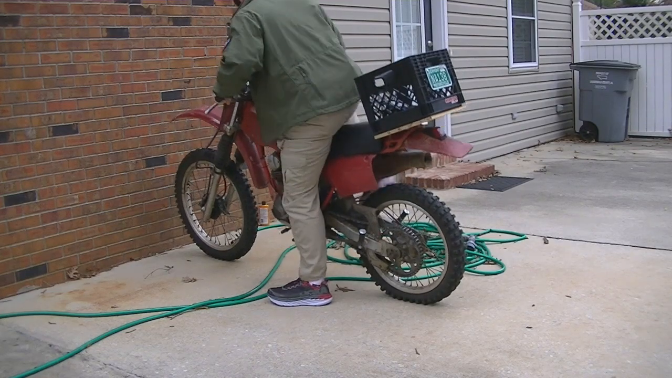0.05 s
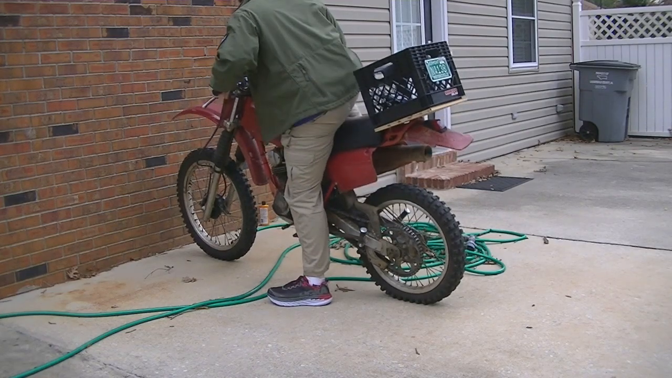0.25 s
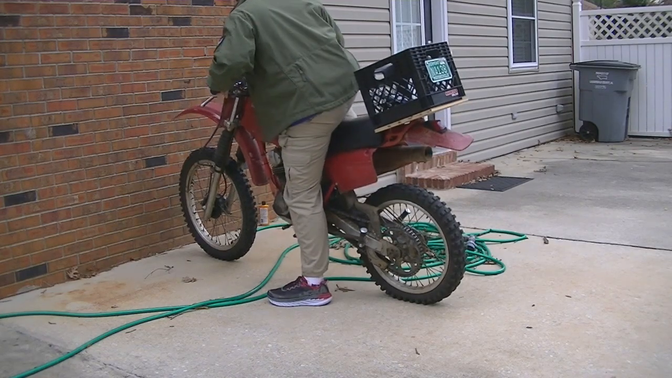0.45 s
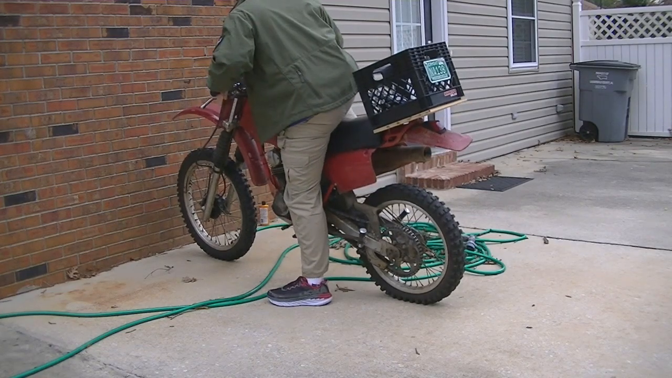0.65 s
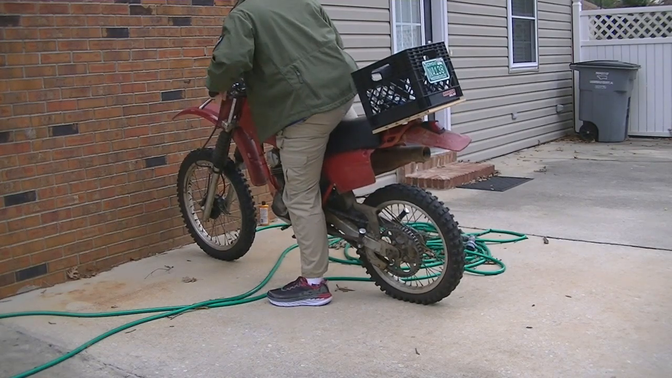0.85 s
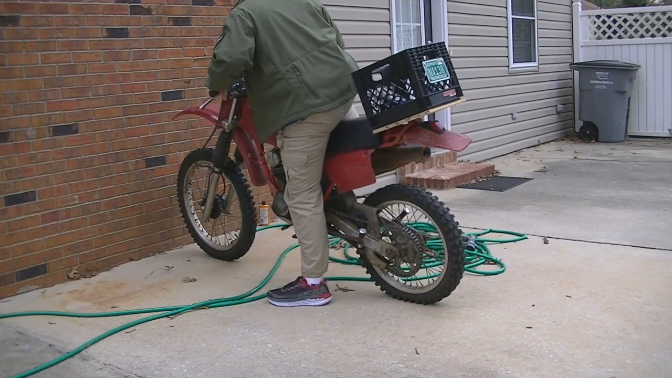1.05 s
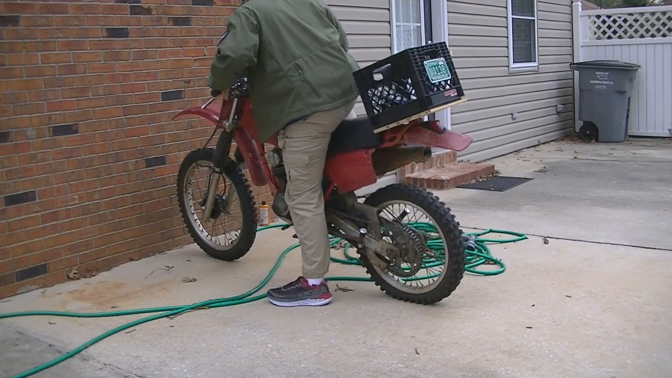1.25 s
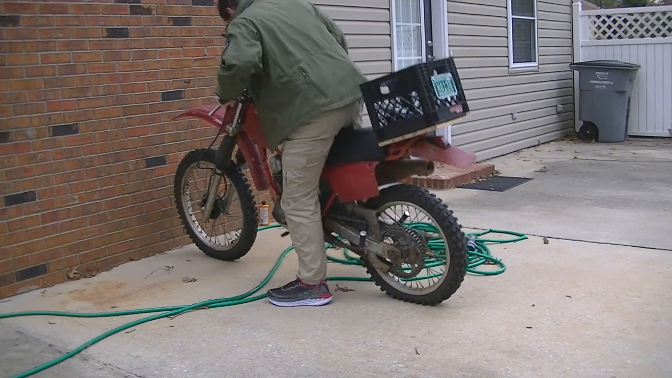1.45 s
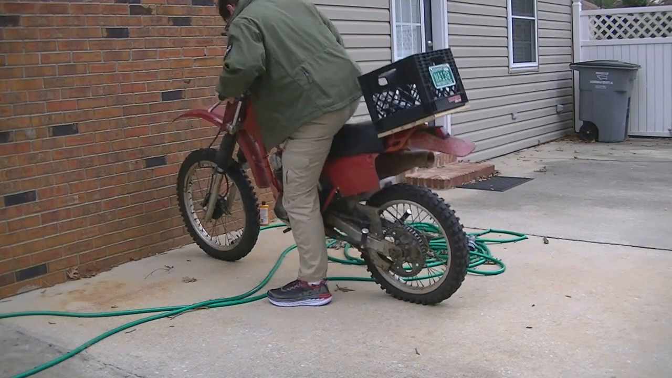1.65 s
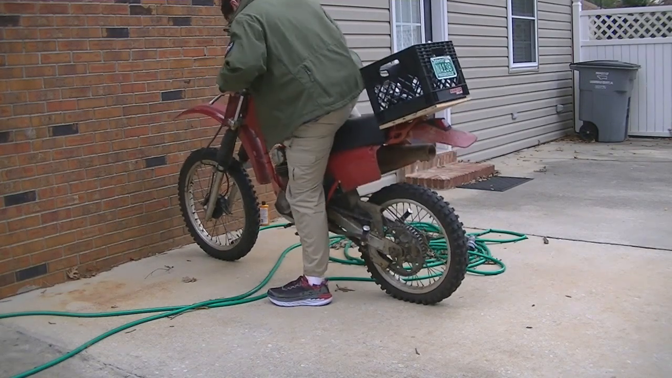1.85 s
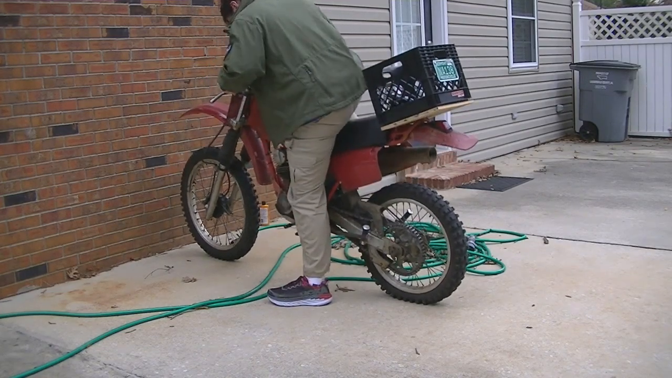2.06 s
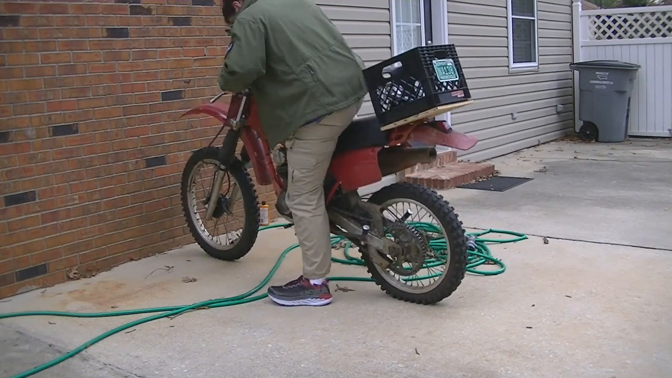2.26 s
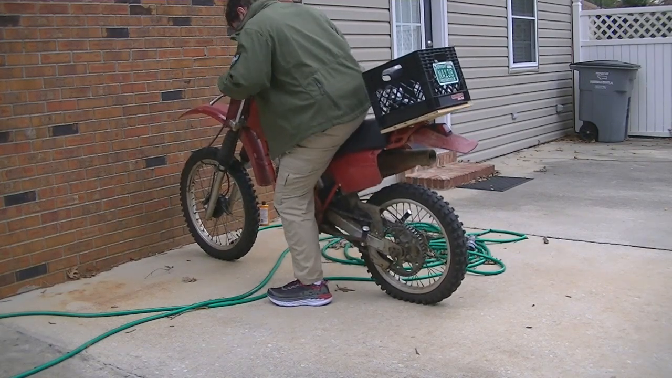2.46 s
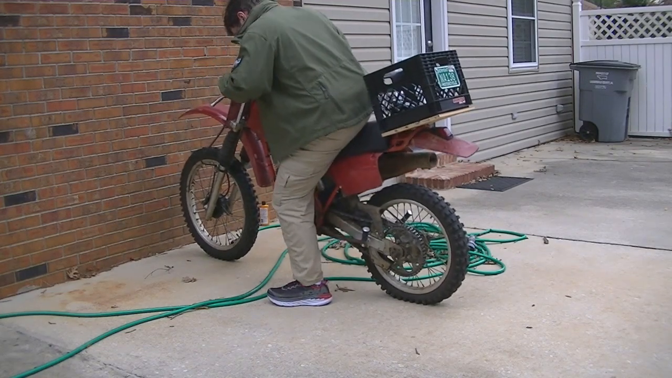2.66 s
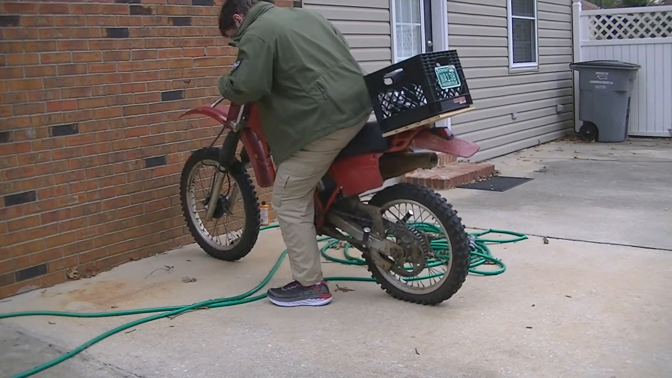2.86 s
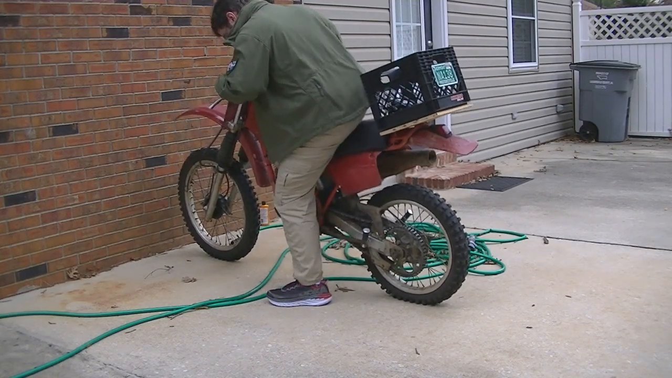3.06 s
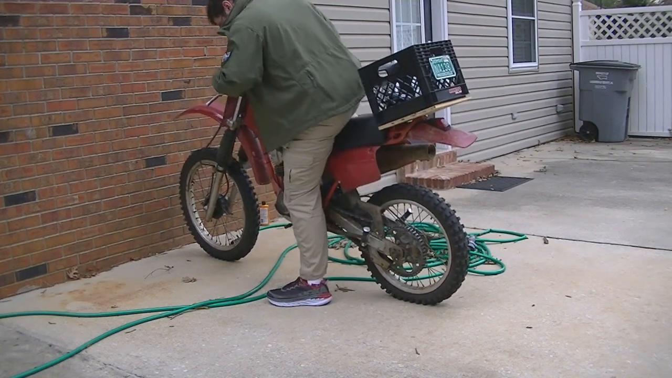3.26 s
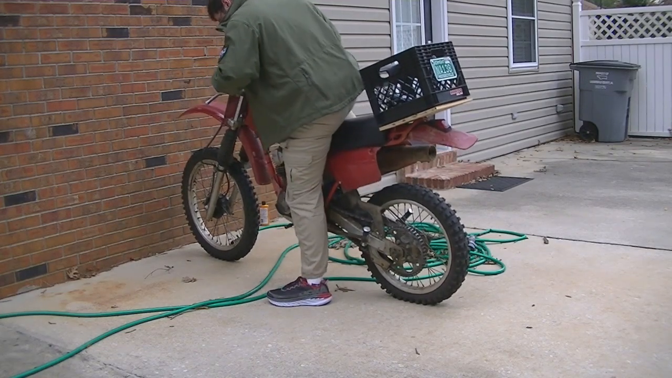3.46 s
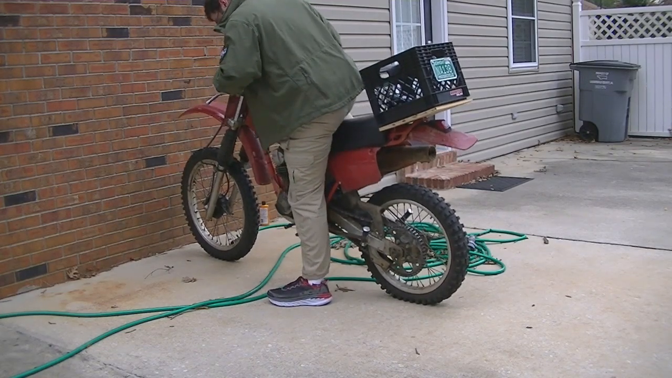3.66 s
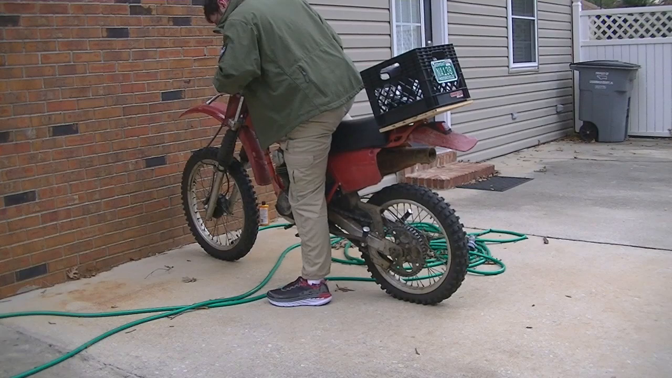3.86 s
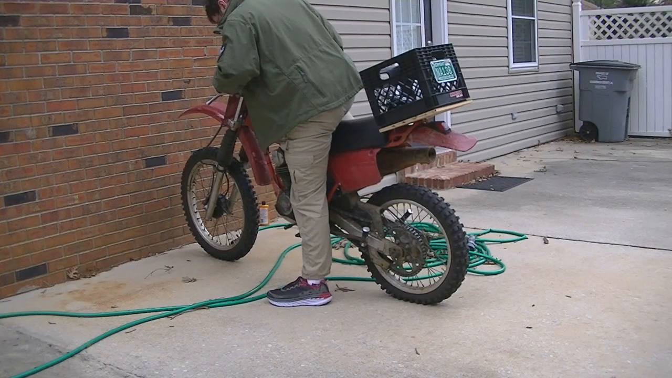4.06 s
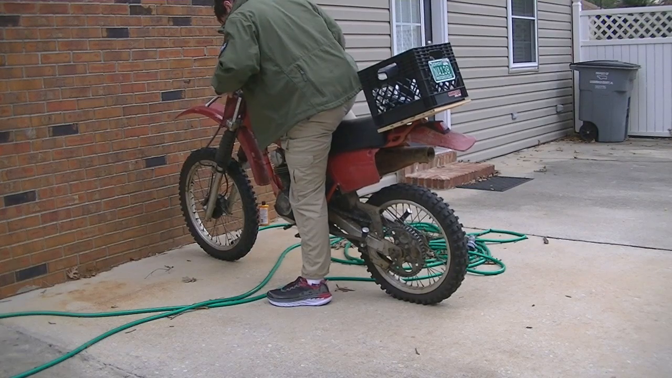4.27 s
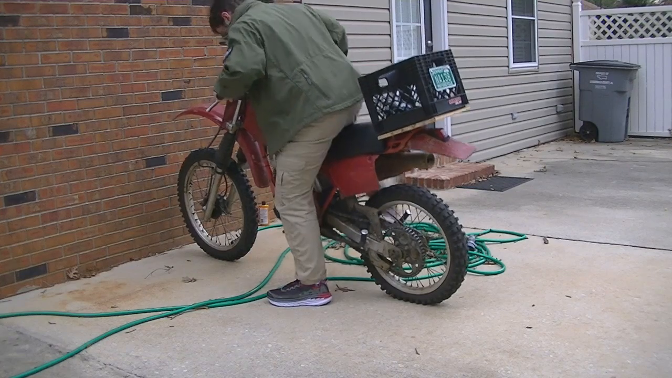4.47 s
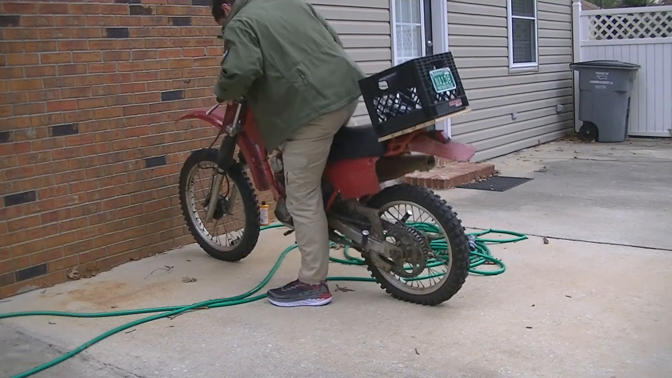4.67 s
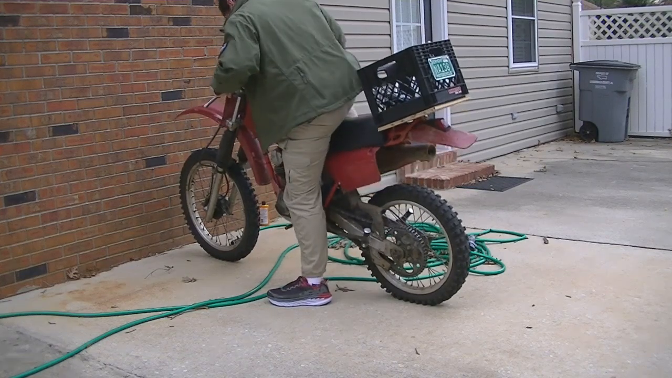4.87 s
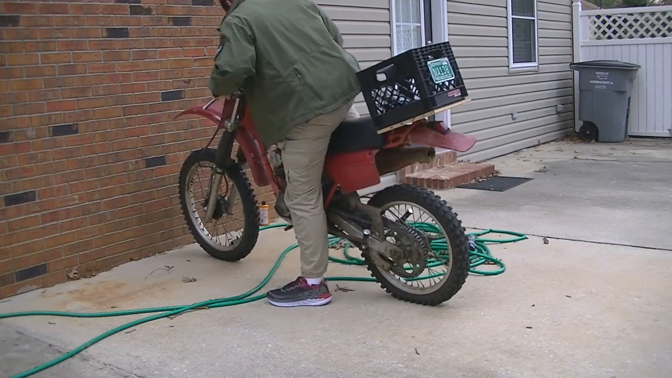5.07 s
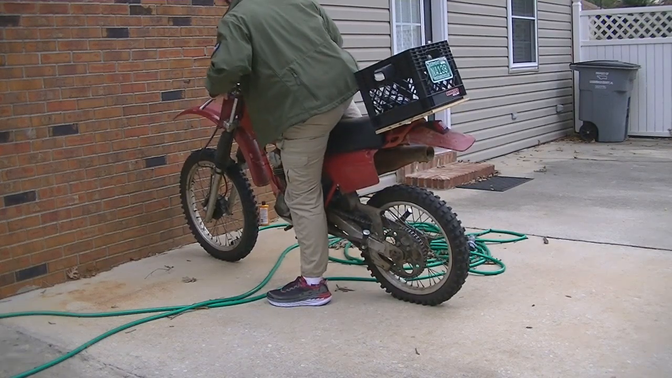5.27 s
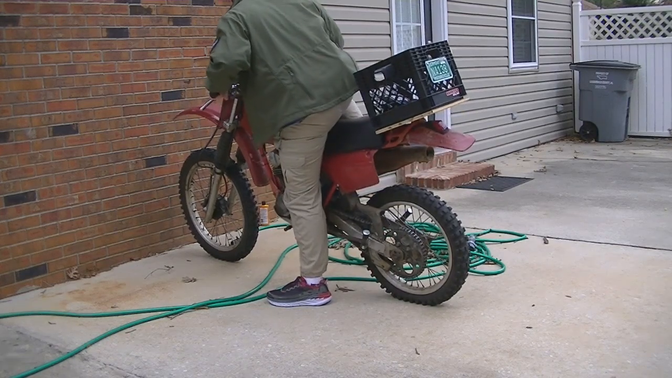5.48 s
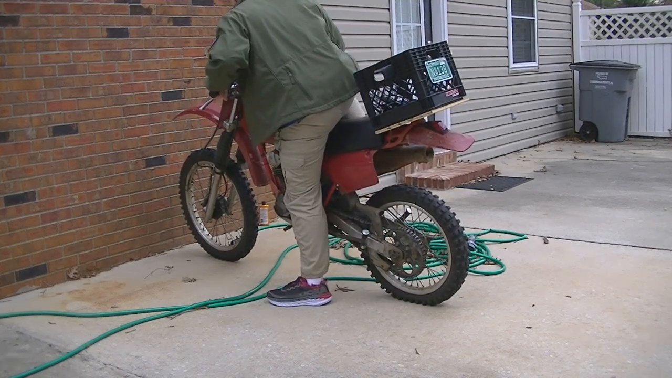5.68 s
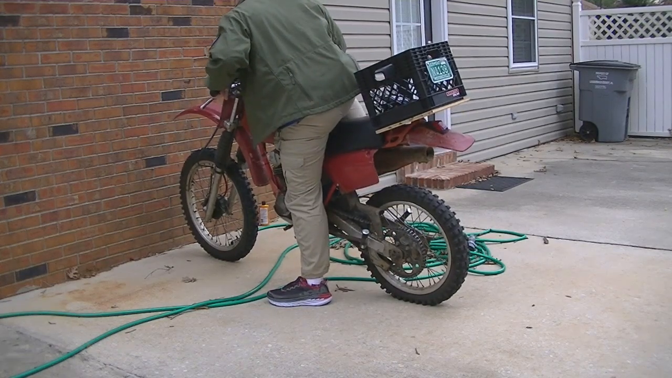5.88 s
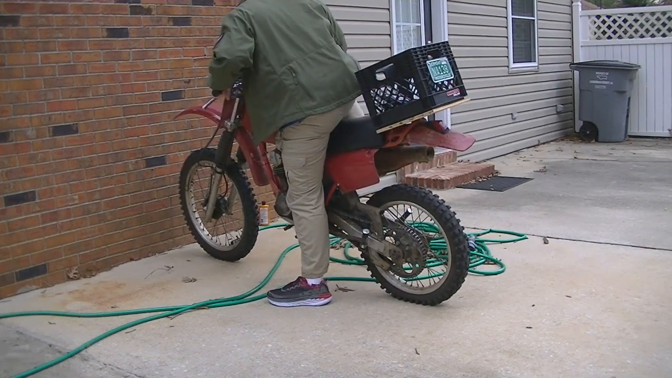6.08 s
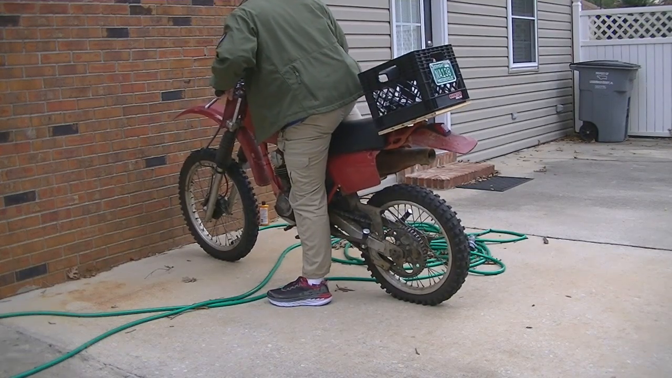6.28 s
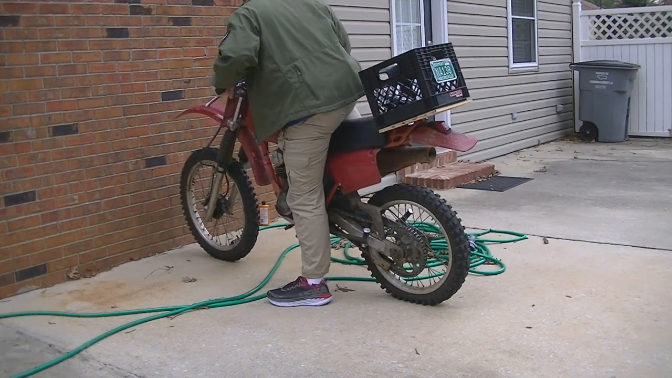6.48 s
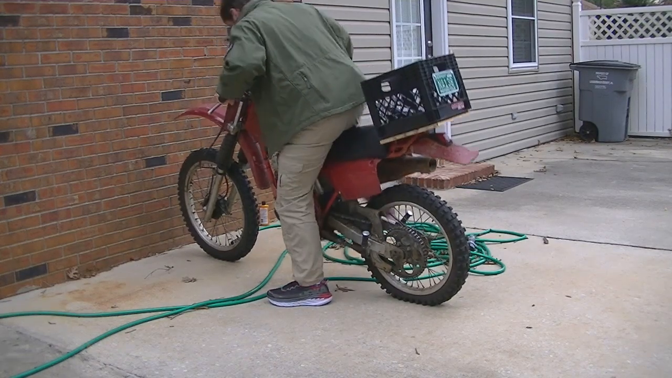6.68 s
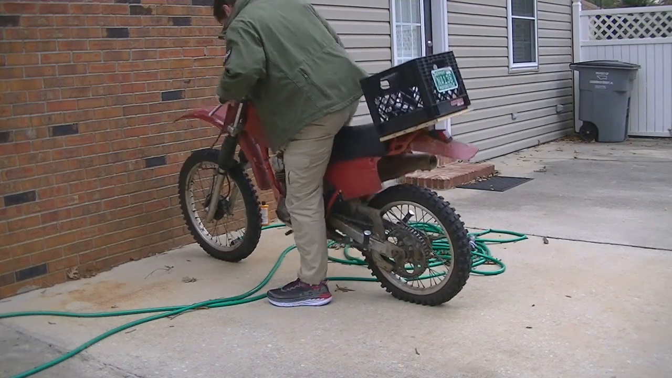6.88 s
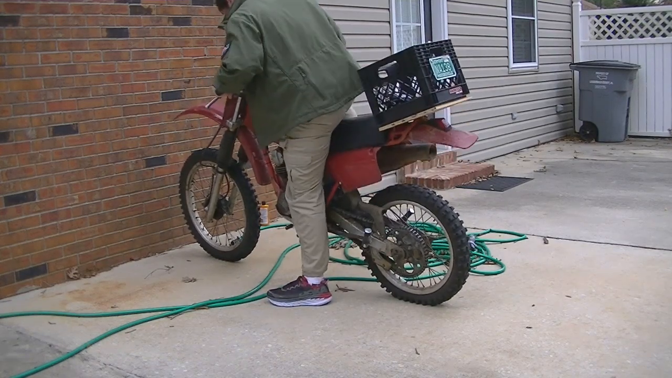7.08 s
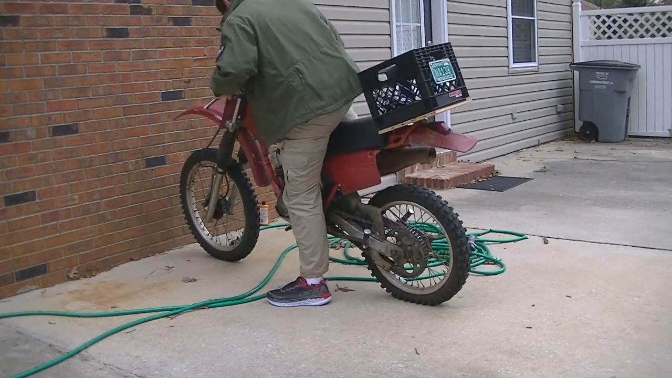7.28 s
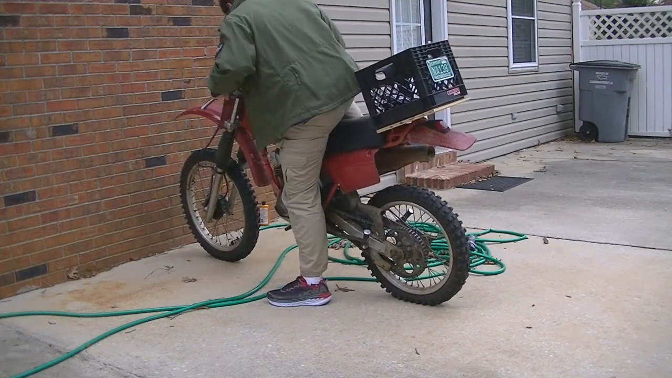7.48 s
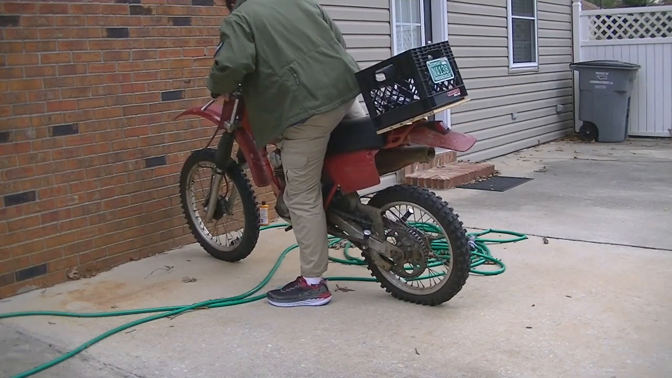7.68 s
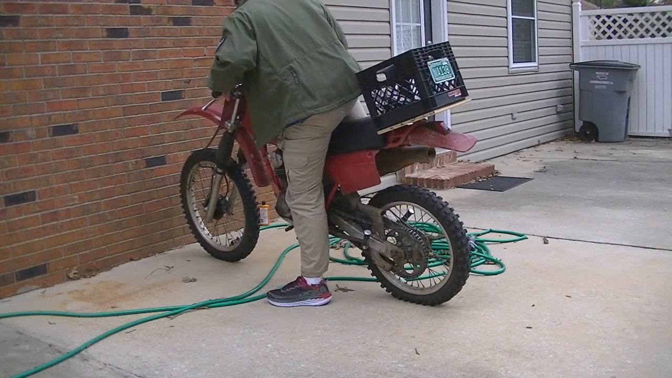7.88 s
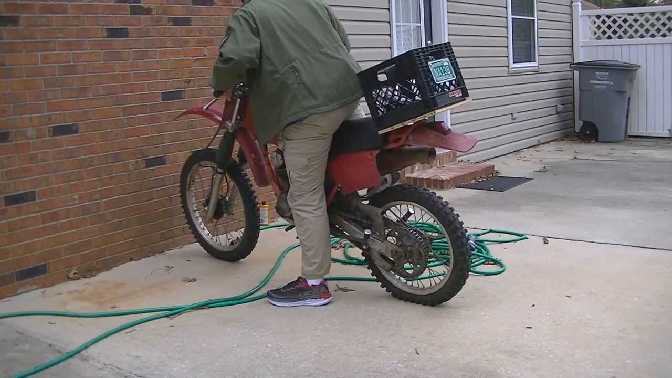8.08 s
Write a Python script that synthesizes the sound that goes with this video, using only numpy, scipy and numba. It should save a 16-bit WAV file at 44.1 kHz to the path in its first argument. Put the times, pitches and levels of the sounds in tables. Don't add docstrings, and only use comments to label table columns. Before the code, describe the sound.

Someone kicks over a cold dirt bike three times outdoors, metal clanking, gears whirring and exhaust chuffing, but the engine never catches; low hum behind.

```python
import sys
import numpy as np
from scipy import signal
from scipy.fft import rfft, irfft
from scipy.io import wavfile
from scipy.ndimage import uniform_filter1d
from numba import njit

SR = 44100
rng = np.random.default_rng(int(sys.argv[2]) if len(sys.argv) > 2 else 0)


def gain_from_decibels(decibels):
    exponent = np.asarray(decibels, float) / 20
    return 10 ** exponent


def waveform_to_disk(signal):
    frames = np.transpose(np.atleast_2d(signal))
    scaled = np.clip(frames, -1, 1) * 32767
    samples = np.round(scaled).astype(np.int16)
    wavfile.write(sys.argv[1], SR, samples)


N = 358533


@njit
def ring(x, hz, t60, gain):
    y = np.zeros(len(x))
    for m in range(len(hz)):
        turn = np.exp((2j * np.pi * hz[m] - np.log(1000) / t60[m]) / SR)
        state = 0j
        for i in range(len(x)):
            state = state * turn + x[i]
            y[i] += gain[m] * state.imag
    return y


def unit(x):
    return x / np.sqrt(np.mean(x ** 2))


def colour(x, points):
    hz, db = np.transpose(points)
    f = np.maximum(np.fft.rfftfreq(len(x), 1 / SR), 1)
    gain = gain_from_decibels(np.interp(np.log(f), np.log(hz), db))
    return irfft(rfft(x) * gain, len(x))


def walk(rate):
    hold = int(SR / rate)
    steps = np.repeat(rng.standard_normal(N // hold + 1), hold)
    return 1.417 * uniform_filter1d(uniform_filter1d(steps, hold), hold)[:N]


def grains(size, spread_db):
    return unit(rng.standard_normal(size) * gain_from_decibels(spread_db * rng.exponential(size=size)))


def add(out, s, x, db):
    i = int(s * SR)
    out[i:i + len(x)] += (x * gain_from_decibels(db) / np.abs(x).max())[:len(out) - i]


def metal(low_db, mid_db, high_db):
    return [(150, low_db - 10), (450, low_db + 7.0), (1100, low_db + 12), (1600, 0),
            (3000, 0.45 * mid_db), (4800, mid_db),
            (7500, high_db), (11000, high_db - 7.5), (15500, high_db - 14.5)]


# frequency in Hz, level in dB per Hz.
TRAFFIC = [(15, -36), (25, -44), (43, -19.5), (102, -9), (134, -9.5), (190, -14.5), (249, -9.5),
           (317, -13.5), (427, -10.5), (463, -16), (503, -12), (863, -11.5), (1600, -19.5), (2500, -25),
           (16000, -36.5)]
# frequency in Hz, level in dB.
FAINT = [(55., -67), (187., -58.5), (216., -59.5), (225., -63), (350., -62.5), (378., -60), (430., -63),
         (505., -61.5), (646., -65.5)]
# time in seconds, lower compressor, upper compressor and fan in dB.
MACHINES = [(0, -68, -54, -65), (.8, -55, -57, -59), (1.2, -56.5, -65, -54.5), (2.2, -50.5, -49, -59),
            (2.7, -59, -51.5, -54), (3.45, -47, -48, -59.5), (4.1, -57, -52, -50.5),
            (4.7, -49.5, -56.5, -53), (5.5, -58, -48.5, -49.5), (6.1, -55.5, -48.5, -56),
            (7.1, -47.5, -48, -48), (7.5, -46.5, -57, -54), (8.13, -60, -47, -50)]
# start and length in seconds, level in dB.
SURGES = [(0.2, 0.8, -52.5), (1.173, 0.51, -48.5), (1.948, 0.58, -44), (2.76, 0.73, -51.5),
          (3.683, 0.55, -50.5), (4.756, 0.29, -51), (6.127, 0.99, -49), (7.5, 0.99, -56)]


def yard():
    t = np.arange(N) / SR

    def tone(hz, drift_hz, db):
        phase = 2 * np.pi * np.cumsum(hz + drift_hz * walk(2.2)) / SR
        return np.sin(phase) * gain_from_decibels(db + 2.46 * walk(11.0))

    s, *columns = np.transpose(MACHINES)
    low_db, high_db, fan_db = (np.interp(t, s, c) for c in columns)
    out = tone(126.7, .4, low_db + 3) + tone(134.9, .4, high_db + 3) + tone(161., .5, fan_db + 3)
    surge = gain_from_decibels(-63)
    for start, length, db in SURGES:
        swell = np.sin(np.pi * np.clip((t - start) / length, 0, 1)).clip(0)
        surge = surge + gain_from_decibels(db) * np.sqrt(swell)
    out += tone(251.6, 0.907, 0.2) * surge
    for hz, db in FAINT:
        out += tone(hz, 1.164, db + 2.8 * walk(2.58))

    traffic_db, hiss_db = -46.5, -47
    car_db = 1.4 * np.exp(-((t - 5.57) / 1) ** 2)
    treble = [(9000, -34.5), (13000, -40.5), (16000, -43)]
    bed = unit(colour(rng.standard_normal(N), TRAFFIC[:-1] + treble))
    octaves = np.log2(np.fft.rfftfreq(N, 1 / SR) + 1)
    for hz in 15 * 2 ** np.arange(11):
        band = irfft(rfft(bed) * (1 - np.abs(octaves - np.log2(hz))).clip(0), N)
        if hz < 1500:
            level_db = traffic_db + car_db + 0.6 * walk(5.04)
        else:
            level_db = hiss_db + 1.25 * walk(5.1)
        out += band * gain_from_decibels(level_db)
    return out


# lowest Hz, highest Hz, cycles of ring.
FRAME = (700, 16000, 40)
# time in seconds, whirr level in dB.
WHIRR = [
    [(0.0, -44), (.06, -46.5), (0.13, -46.5), (.2, -50), (.3, -49), (0.346, -57), (0.5, -59.5)],
    [(1.27, -82), (1.362, -53), (1.44, -37.5), (1.518, -30), (1.594, -42.5), (1.65, -46), (1.68, -44.5),
     (1.76, -54), (1.83, -53), (2.05, -55.5)],
    [(4.36, -62), (4.478, -43.5), (4.52, -37.5), (4.608, -34.5), (4.66, -40.5), (4.79, -37), (4.86, -44.5),
     (4.97, -48.5), (5.1, -56)],
    [(6.55, -81), (6.68, -33.5), (6.834, -33.5), (6.902, -35), (6.98, -36.5), (7.09, -48.5), (7.16, -50),
     (7.35, -54)],
]
PUSH_S = (-0.5, 0.76, 4.5, 6.5)


def whirr():
    out = np.zeros(N)

    def scrape(hz):
        fits = grains(N, 0.9) * gain_from_decibels(4.6 * walk(30))
        return unit(ring(fits, np.array([hz]), np.array([22 / hz + 0.0029]), np.ones(1)))

    panels = unit(sum(scrape(hz) * np.sqrt(hz) for hz in np.geomspace(*FRAME[:2], num=24)))
    cases = panels + .9 * unit(grains(N, 2.7) * gain_from_decibels(4.0 * walk(160)))
    teeth_per_s, tooth_s = 170, .001
    teeth = (rng.random(N) < teeth_per_s / SR) * gain_from_decibels(2.5 * rng.standard_normal(N))
    tooth_fades = signal.lfilter([1], [1, -np.exp(-1 / tooth_s / SR)], teeth)
    cases += gain_from_decibels(-4) * unit(rng.standard_normal(N) * tooth_fades)

    main = metal(-12.5, -4.5, -25.0)
    groan = [(120, -10), (300, 24.0), (1200, 2.0), (1800, -20.0)]
    sizzle = [(4500, -10), (6500, 1), (15000, -11)]
    parts = [unit(colour(cases, points)) * gain_from_decibels(1.4 * walk(45)) for points in (main, groan, sizzle)]
    for table, push in zip(WHIRR, PUSH_S):
        s, level_db = np.transpose(table)
        t = np.arange(int(s[0] * SR), int(s[-1] * SR))
        low_db = np.interp(t / SR - push, (0, 0.29), (5, -10.5))
        for part, share_db in zip(parts, (0, low_db, -11.5)):
            out[t] += part[t] * gain_from_decibels(np.interp(t / SR, s, level_db) + share_db)
    return out


# start in seconds, peak in dB, note in Hz, length in seconds.
FLECKS = [(.024, -25, 2700, 0.0057), (0.031, -32, 3770, .012), (0.069, -33, 2390, 0.014),
          (0.163, -41, 1200, .02), (0.173, -35, 3220, .012), (0.177, -44, 6600, .015),
          (.292, -41, 4300, .016), (0.295, -40, 2900, .014), (1.421, -24, 3150, 0.0041),
          (1.422, -30, 4500, .012), (1.476, -23, 2740, 0.0081), (1.58, -33, 1150, 0.022),
          (1.621, -33, 3780, .03), (1.69, -35, 4720, 0.031), (1.716, -34, 4400, .035),
          (1.717, -42, 1200, .01), (1.732, -34.5, 5970, 0.024), (1.78, -34, 3230, 0.011),
          (4.775, -24, 2150, 0.022), (4.83, -41, 3520, .01), (4.84, -34.5, 3130, 0.019),
          (4.965, -39, 4300, .008), (6.683, -20, 3070, 0.0067), (6.892, -30, 4430, 0.027),
          (6.954, -33, 1870, .02), (7.106, -24.5, 4300, .01), (0.208, -26, 5600, 0.0072),
          (7.125, -45, 6900, 0.017), (7.943, -44, 5500, .008), (8.003, -45, 6150, 0.025),
          (8.034, -42, 3230, 0.0066), (8.118, -47, 5000, 0.01)]


def flecks():
    out, t = np.zeros(N), np.arange(4096) / SR
    for s, db, hz, length in FLECKS:
        stroke = np.sin(np.pi * np.clip(t / max(length, .002), 0, 1))
        rub = grains(len(t), 3.5) * stroke
        song = ring(rub, hz * np.array([1., 1.04]), np.full(2, 0.031), gain_from_decibels(np.array([0., -8.])))
        add(out, s, song, db)
    return out


# frequency in Hz, time to fall 60 dB in seconds, level in dB.
LEVER = [(1370, .035, 3), (1680, .03, 8), (2150, .03, -3), (2700, .035, 6), (2840, .035, 3), (3070, .03, 7),
         (3690, .03, 1), (4280, .025, 3), (4950, .02, 0), (6860, .025, -8), (7690, .02, -10)]
# frequency in Hz, time to fall 60 dB in seconds, level in dB.
CRANKCASE = [(1040, .055, -1), (1187, .06, -7), (1300, .035, -11), (1985, .04, -6), (2148, .035, 3),
             (2420, .03, -3), (2720, .03, -8), (3080, .035, 0), (3230, .035, -3), (3690, .03, -8),
             (4480, .025, -10), (5210, .022, -7), (6670, .022, -12), (7200, .02, -18)]
# start in seconds, peak in dB, loudest ring in Hz,
# rattle decay in seconds. Here the ratchet bites and the gears take the load.
BITES = [(1.4162, -11, 4670, 0.011), (1.5928, -22.5, 2200, 0.026), (1.737, -27.5, 4600, 0.033),
         (4.4414, -26.5, 6540, 0.009), (4.4912, -11.5, 3170, 0.012), (4.6708, -22.5, 2830, .01),
         (4.6874, -17.5, 5170, 0.015), (4.8312, -28, 2240, 0.0095), (6.6827, -8.5, 3150, 0.0086),
         (6.6994, -22, 3000, 0.009), (6.8889, -21.5, 2680, 0.019), (7.124, -27, 2820, 0.0042)]
SLAMS = [(1.4394, -18.5, 1410, 0.013), (1.4574, -22, 1720, 0.0058), (1.5125, 1.5, 2190, 0.0049),
         (4.5144, -21, 1870, 0.004), (4.5344, -21, 2100, 0.065), (4.5897, -2, 2160, 0.0052),
         (4.7385, -7, 2700, 0.0091), (4.774, -15, 2180, 0.0059), (6.756, -7, 1320, 0.0065),
         (6.8036, -1, 3300, 0.0053), (6.9509, -15.5, 2110, 0.0089)]
RETURNS = [(.0246, -22.5, 2780, 0.0048), (.0676, -41, 5500, 0.016), (.1637, -34, 3200, 0.0053),
           (.2081, -16, 2140, 0.0081), (1.3484, -37, 2140, 0.0053), (1.5551, -27.5, 3040, .009),
           (1.6244, -28, 3750, 0.0067), (1.6924, -37, 6540, .02), (1.7945, -37, 3130, 0.0076),
           (1.8434, -20.5, 3200, 0.012), (4.4767, -27, 1590, 0.013), (4.6297, -26, 2980, 0.0086),
           (4.9094, -32.5, 2020, 0.0089), (5.4385, -41.5, 3220, 0.004), (6.6592, -38, 2480, 0.023),
           (6.7194, -21, 4860, 0.0041), (6.9353, -38, 2100, .008), (7.0402, -31, 3180, .0064)]
NUDGES = [(.3944, -35, 1610, .008), (.4153, -36.5, 1290, 0.005), (.8948, -36, 1700, 0.0082),
          (1.034, -37.5, 1770, 0.0039), (1.283, -34, 1720, 0.009), (1.9668, -40, 1290, 0.0088),
          (2.0684, -30.5, 1390, 0.02), (2.2651, -33.5, 1750, .0075), (2.4128, -32.5, 1750, 0.023),
          (3.2608, -37.5, 1390, .009), (3.2909, -38.5, 1710, 0.0048), (3.3894, -38, 1680, 0.005),
          (3.5389, -29.5, 1700, 0.0085), (3.6299, -36.5, 1280, 0.011), (4.4235, -28.5, 1850, 0.0065),
          (5.0973, -30, 3050, 0.0032), (5.3276, -38.5, 1750, 0.015), (6.6161, -31.5, 1540, 0.0053),
          (7.2494, -41, 3120, .007), (7.4212, -40, 1338, 0.0071), (7.454, -38, 1380, 0.0084),
          (7.871, -34.5, 1310, 0.0052), (7.9286, -28.5, 1560, 0.0069), (7.9464, -53, 1330, .007),
          (8.09, -39, 2800, .02)]
SNAPS = [(.0666, -26, 12000, .018), (.431, -46.5, 13000, .0061), (1.9396, -39, 10500, .0095),
         (2.41, -45, 7000, .03), (2.771, -45, 6500, .007), (3.111, -43, 8000, .0062),
         (5.171, -42.5, 11400, .0052), (6.1333, -37, 6100, .0105), (6.575, -43, 5200, .0085),
         (7.0585, -40.5, 11100, .0105), (7.1945, -44.5, 11400, .0042), (8.0125, -46, 6500, .012)]
SEATS = [(.2586, -21.5, 2870, 0.0084), (4.9236, -19.5, 1680, 0.0072), (4.9588, -37.5, 2620, .006),
         (7.1092, -18.5, 3070, 0.0051), (7.1484, -32, 2920, 0.0046)]
STAMPS = [(1.494, -17.5, 900, 0.013), (4.567, -10, 740, 0.011), (6.62, -32, 900, 0.02)]
# table of blows, part that rings, share at 0.5-1.4 kHz in dB, share at 5 kHz in dB,
# share at 6-14 kHz in dB, ring of the part in dB, first crack in dB.
KINDS = [(BITES, CRANKCASE, -19, 0.5, 1.5, -9, -8), (SLAMS, CRANKCASE, -13, -0.3, -4.5, -4, 2),
         (RETURNS, LEVER, -21, -1.6, -10, -4, -3), (SEATS, LEVER, -23, -1.6, -9, 2, 1),
         (STAMPS, CRANKCASE, -3, -6, -18, -8, -18), (SNAPS, LEVER, -20, 0.3, 7, -15, 8),
         (NUDGES, LEVER, -13, -11, -32, -5, -13)]


def blow(peak_db, ring_hz, decay, part, tint, ring_db, crack_db):
    t = np.arange(8192) / SR
    u = t / np.clip(decay, .001, .05)
    bounces = gain_from_decibels(2.5 * uniform_filter1d(np.repeat(rng.standard_normal(128), 64), 40))
    onset = 1 - np.exp(-t / 0.0021)
    fade = np.exp(-(u / 2.1) ** 1.35) + 0.06 * np.exp(-u / 2.2)
    rattle = grains(len(t), 1.8) * bounces * onset * fade

    low_hz, high_hz, cycles = FRAME
    modes = low_hz * (high_hz / low_hz) ** ((np.arange(40) + rng.random(40)) / 40)
    hz = np.append(modes, ring_hz)
    gain = np.append(modes / ring_hz * gain_from_decibels(4.5 * rng.standard_normal(40)), gain_from_decibels(7.0))
    plates = unit(ring(rattle, hz, cycles / hz + .0015, gain))
    part_hz, part_t60, part_db = np.transpose(part)
    part_gain = gain_from_decibels(part_db + 3.0 * rng.standard_normal(len(part)))
    part_ring = unit(ring(rattle, part_hz, part_t60, part_gain))

    click = rng.standard_normal(len(t)) * np.exp(-np.abs(t - .002) / .0009)
    crack = gain_from_decibels(crack_db + 0.7 * peak_db) * np.abs(plates).max() * click
    mix = plates + gain_from_decibels(ring_db) * part_ring + gain_from_decibels(-3.5) * unit(rattle) + crack
    return colour(mix, tint)[:7000]


def clanks():
    out = np.zeros(N)
    for rows, part, low_db, mid_db, high_db, ring_db, crack_db in KINDS:
        tint = metal(low_db, mid_db, high_db)
        for s, peak_db, ring_hz, decay in rows:
            sound = blow(peak_db, ring_hz, decay, part, tint, ring_db, crack_db)
            add(out, s - .0015, sound, peak_db + .5)
    return out


# start in seconds, peak in dB, pipe note in Hz, push in seconds.
CHUFFS = [(0.029, -26.5, 161, 0.0058), (1.307, -33.5, 173, 0.0041), (1.413, -21.5, 153, 0.0018),
          (1.57, -20.5, 154, 0.0037), (1.691, -30.5, 157, 0.0042), (4.438, -29, 158, 0.0023),
          (4.484, -27, 169, 0.0053), (4.561, -22.5, 188, 0.0071), (4.64, -26, 161, 0.0089),
          (6.685, -10, 161, 0.0054), (6.868, -17.5, 147, 0.0053), (7.001, -34, 161, 0.0069)]


def chuffs():
    out, t = np.zeros(N), np.arange(8192) / SR
    for s, db, hz, push in CHUFFS:
        swell = np.exp(-(t / np.clip(push, .001, .03) - 1.5) ** 2)
        breath = 1 + .4 * rng.standard_normal(len(t))
        puff = swell * np.sin(2 * np.pi * hz * t) * breath
        pipe = ring(puff, hz * np.array([1., 1.93]), np.array([.075, .04]), gain_from_decibels(np.array([0., -12.])))
        add(out, s - .004, pipe, db)
    return out


# start in seconds, peak in dB, ring in Hz.
TICKS = [(1.4034, -25, 2220), (1.421, -20, 3050), (1.4249, -16, 4440), (1.444, -26, 2700),
         (1.4575, -21, 4300), (1.5058, -14, 2320), (1.518, -16, 2150), (1.5234, -12, 2150),
         (1.533, -17, 1210), (1.563, -24, 2890), (1.609, -27, 2400), (1.625, -29, 2900), (1.695, -33, 8200),
         (1.9236, -35, 1720), (4.435, -34, 7500), (4.4951, -13.5, 3100), (4.499, -12.5, 3100),
         (4.524, -18, 2020), (4.532, -22, 4200), (4.5739, -13, 1500), (4.5953, -10.5, 2420),
         (4.601, -17, 2090), (4.638, -26, 4180), (4.752, -14, 4200), (4.837, -30.5, 8300),
         (4.8817, -31, 2040), (4.908, -36, 9900), (4.936, -32, 1600), (6.6702, -28, 3200),
         (6.846, -26, 4200), (6.862, -30, 8200), (6.877, -24, 3000), (6.899, -27, 8270),
         (6.9346, -24, 2180), (6.9555, -21, 2060), (6.993, -35, 5700), (7.014, -31, 2400),
         (7.145, -30, 2800), (.0676, -34, 6000), (0.037, -27, 3800), (.071, -32, 11800), (.079, -35, 11500),
         (0.2142, -20.5, 5600), (4.7405, -13, 4650), (1.521, -14.5, 795), (7.113, -29, 8200),
         (3.539, -33, 2900), (5.415, -38, 2000), (5.89, -40, 1900), (6.15, -42, 2200), (6.21, -40, 1900)]


def ticks():
    out, t = np.zeros(N), np.arange(2048) / SR
    t60 = .016 * np.array([0.85, 0.69, 0.85, 0.72])
    gain = gain_from_decibels(np.array([-2.0, -6.0, -7.0, -6.5]))
    for s, db, hz in TICKS:
        touch = rng.standard_normal(len(t)) * np.exp(-np.abs(t - .001) / .0008)
        modes = hz * np.array([1., 0.66, 1.4, 1.3]).clip(0, 15000 / hz)
        rings = ring(touch, modes, t60, gain)
        click = gain_from_decibels(-4) * uniform_filter1d(touch, size=3) / 2
        add(out, s - .001, rings / np.abs(rings).max() + click, db)
    return out


# start in seconds, peak in dB, note in Hz.
TINGS = [(0.098, -31, 8300), (3.5944, -53, 8360), (3.6237, -48, 8300), (5.1406, -41, 8300),
         (5.175, -45, 11300), (7.064, -36, 8500), (7.126, -35, 7700), (7.1965, -42, 8430),
         (7.3228, -35.5, 8220), (7.9942, -46, 7270)]


def tings():
    out, t = np.zeros(N), np.arange(8192) / SR
    ratios, t60 = np.array([1., 1.015, 1.45, 1.86]), np.array([.035, .02, .02, .03])
    gain = gain_from_decibels(np.array([0., -4., -15., -12.]))
    for s, db, hz in TINGS:
        tap = rng.standard_normal(len(t)) * np.exp(-(t / 0.0043 - 1) ** 2)
        add(out, s - .003, ring(tap, hz * ratios, t60, gain), db)
    return out


# middle and half length in seconds, note in Hz, level in dB.
TYRES = [(3.05, 0.4, 870, -65), (5.8, 0.85, 860, -55), (0.9, .5, 738, -54.5)]


def tyres():
    out, t = np.zeros(N), np.arange(N) / SR
    for s, half, hz, db in TYRES:
        song = unit(ring(rng.standard_normal(N), np.array([1. * hz]), np.array([0.043]), np.ones(1)))
        passing = np.exp(-((t - s) / half) ** 2)
        out += song * gain_from_decibels(db + 2.2 * walk(6.13)) * passing
    return out


# start in seconds, peak in dB, note in Hz, decay in seconds.
THUDS = [(1.414, -24, 353, 0.029), (1.441, -20, 308, 0.053), (1.493, -12, 332, 0.011),
         (1.509, -14, 397, 0.0064), (4.486, -27, 360, 0.011), (4.518, -32, 346, 0.022),
         (4.564, -12.5, 307, 0.013), (4.588, -18, 317, 0.0059), (4.739, -22, 376, 0.015),
         (4.892, -31, 342, 0.019), (6.662, -27, 340, 0.0085), (6.757, -11, 320, 0.011),
         (6.774, -17.5, 297, 0.014), (6.801, -19, 320, 0.013), (6.955, -29.5, 383, 0.0078)]


def thuds():
    out, t = np.zeros(N), np.arange(8192) / SR
    ratios, t60 = np.array([.72, 1., 1.2, 1.9]), np.array([0.044, 0.042, 0.048, 0.033])
    gain = gain_from_decibels(np.array([1.0, 12.0, 3.4, 1.5]))
    for s, db, hz, decay in THUDS:
        knock = grains(len(t), 2.34) * np.exp(-t / np.clip(decay, .001, .05))
        add(out, s - .002, ring(knock, hz * ratios, t60, gain), db)
    return out


def scene():
    around = yard() + tyres()
    bike = whirr() + flecks() + clanks() + chuffs() + tings() + thuds()
    bike = colour(bike, [(30, -25), (110, -4.0), (200, 0)]) + ticks()
    t60 = .22
    t = np.arange(int(t60 * SR)) / SR
    tail = colour(rng.standard_normal(len(t)), [(200, 16.2), (2000, 8.0), (12000, 15.8)])
    tail *= (t > .006) * gain_from_decibels(-60 * t / t60)
    tail *= gain_from_decibels(-13) / np.sqrt(np.sum(tail ** 2))
    return (bike + signal.fftconvolve(bike, tail)[:N] + around)[None]


def roll_off(x):
    return signal.sosfilt(signal.butter(12, 16820, fs=SR, output="sos"), x)


def record(dry):
    steep = signal.ellip(12, .2, 80, 15880, fs=SR, output="sos")
    cut = signal.sosfilt(steep, np.clip(dry, -1, 1))
    return roll_off(cut.clip(-1, 1))


dry = scene()
out = record(dry)
waveform_to_disk(out)
```